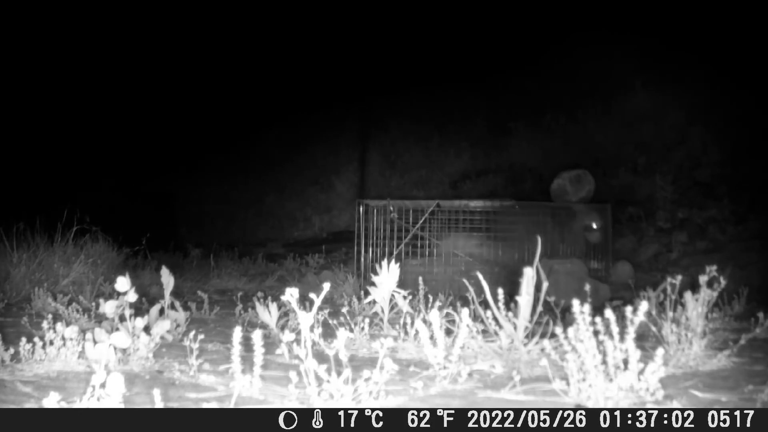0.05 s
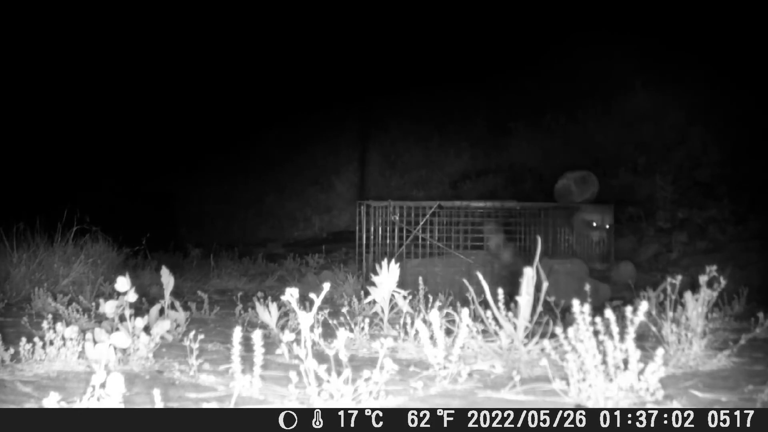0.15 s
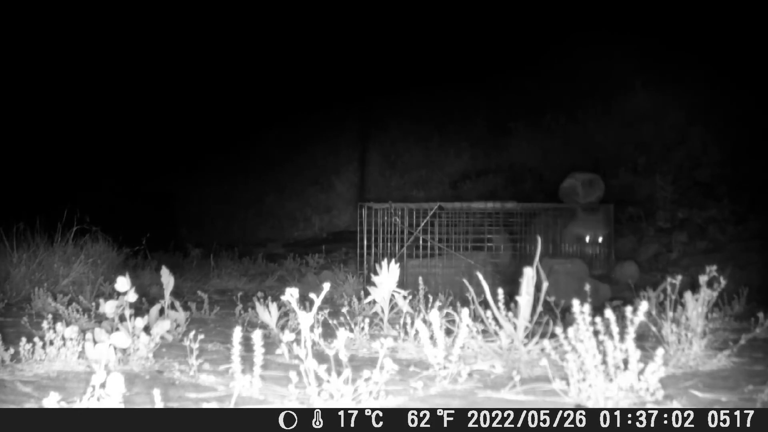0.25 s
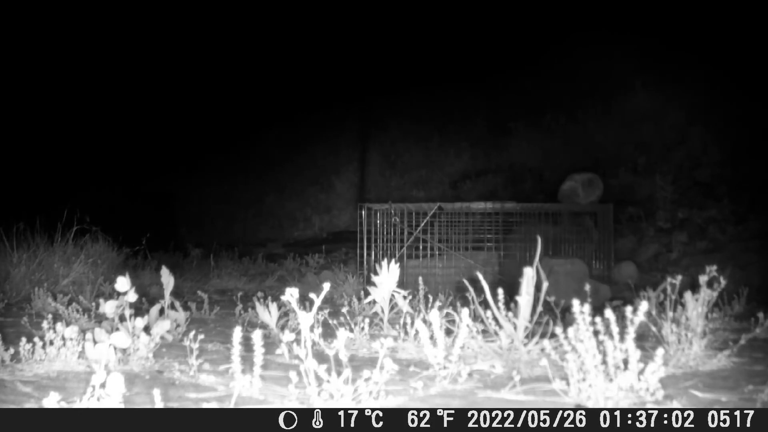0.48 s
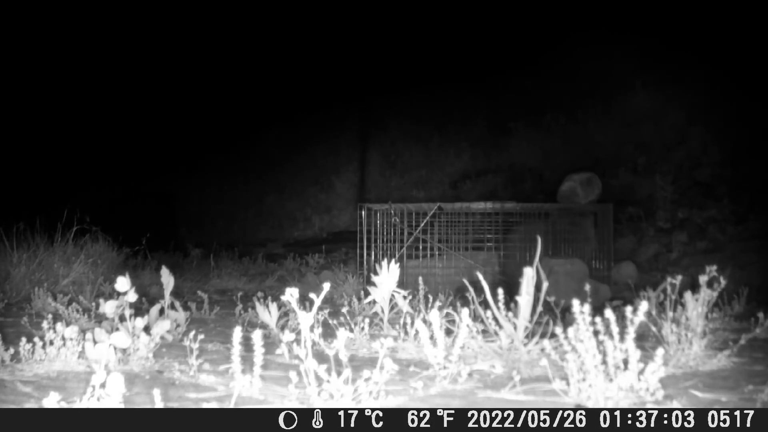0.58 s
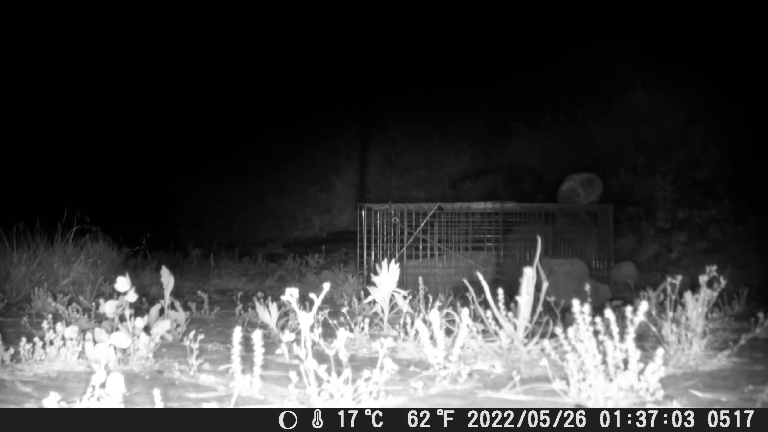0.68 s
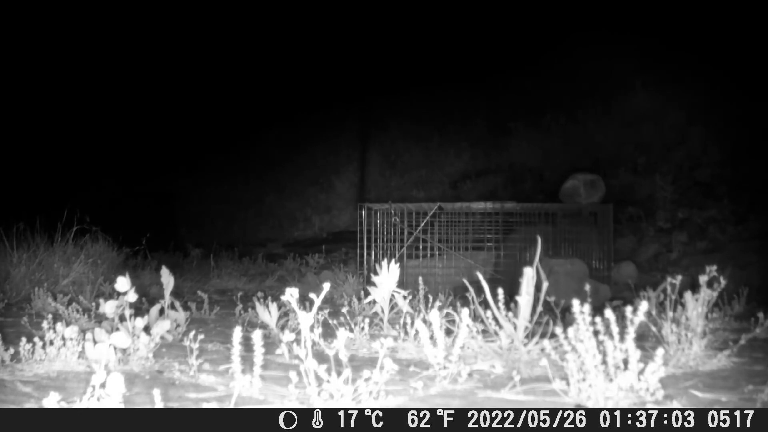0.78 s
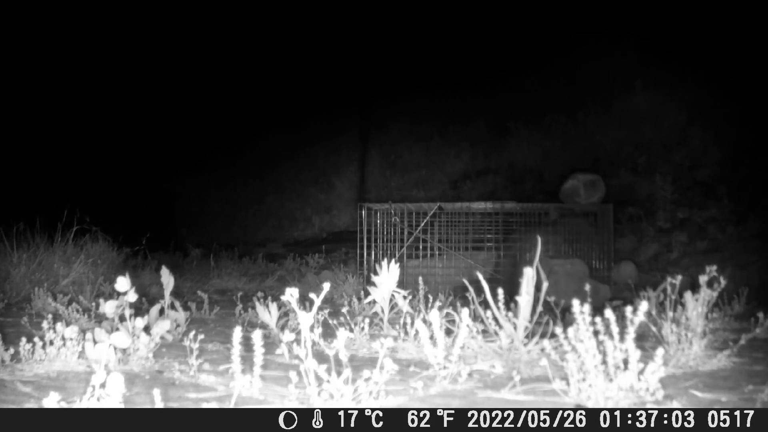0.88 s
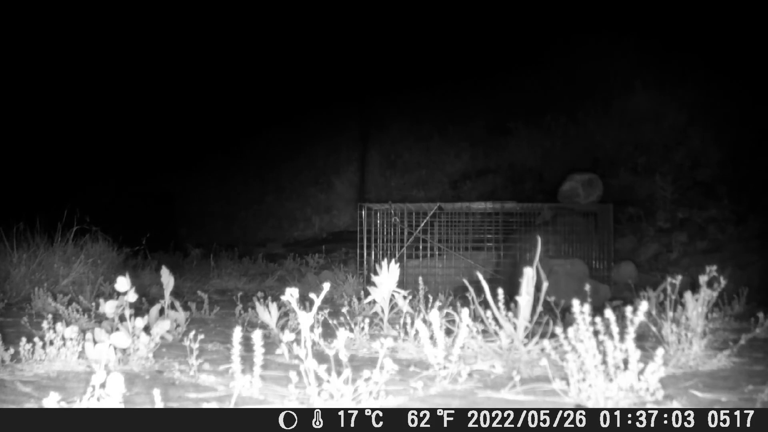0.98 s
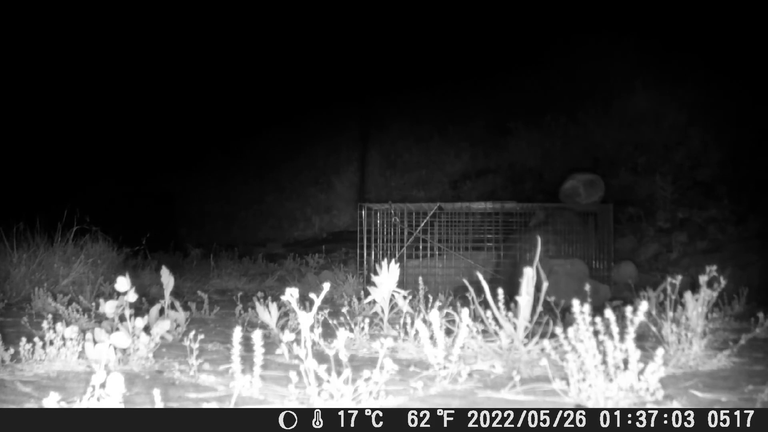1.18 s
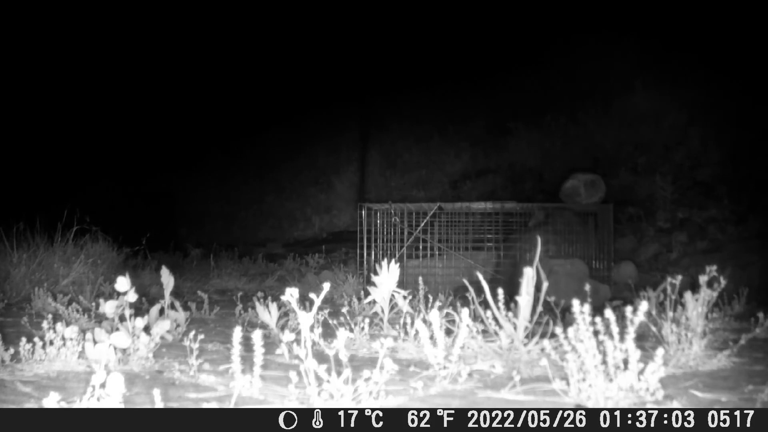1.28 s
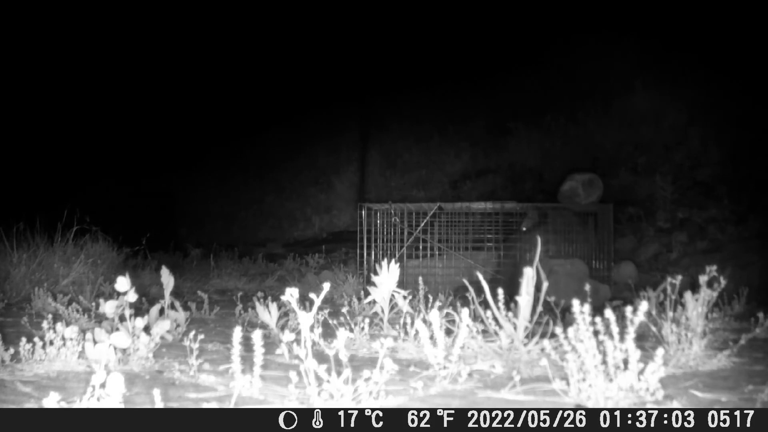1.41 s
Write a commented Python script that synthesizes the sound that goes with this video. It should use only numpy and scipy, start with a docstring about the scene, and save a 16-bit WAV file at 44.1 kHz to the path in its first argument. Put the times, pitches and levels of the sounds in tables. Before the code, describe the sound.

A metal cage trap snaps shut, its wire mesh jangling and fading in a quiet garden.

```python
"""A quiet garden at night, with a wire cage trap. An animal treads on the trip plate, the catch
lets go and the door slams: its plate booms, the wire mesh jangles, the frame thuds on the ground.
The cage then rocks and rattles ever more faintly over a low outdoor rumble. Plate, frame and
long wires ring as decaying modes; the dense mesh and the door's chatter are shaped noise."""
import sys
import numpy as np
from scipy import signal
from scipy.io import wavfile

SR = 44100
rng = np.random.default_rng(int(sys.argv[2]) if len(sys.argv) > 2 else 0)


def master(y):
    """Save y as 16-bit WAV."""
    cut = np.clip(np.atleast_2d(y).T, -1, 1)
    pcm = np.round(cut * 32767)  # scale
    wavfile.write(sys.argv[1], SR, pcm.astype(np.int16))


N = 63945
T = np.arange(N) / SR
HZ = np.fft.rfftfreq(N, 1 / SR)

# metal on metal: trip plate, catch, slam, rebounds, rattles
# (time [s], mesh jangle gain [dB], mesh sizzle gain [dB], door plate gain [dB])
KNOCKS = [(.084, -72.5, -74, -65.5), (.1214, -83, -76.5, -71), (.158, -85, -79.5, -66.5),
          (.231, -51, -52, -66), (.2347, -57.5, -56.5, -42.5), (.2408, -53, -53.5, -68.5),
          (.2438, -51, -56.5, -31), (.2566, -60, -54.5, -34), (.2658, -69, -60, -39.5),
          (.2696, -67, -64.5, -37.5), (.2857, -68.5, -68, -49), (.308, -60, -72.5, -71.5),
          (.3151, -67, -68.5, -52), (.3757, -69, -65, -52), (.4278, -63.5, -65.5, -56.5),
          (.4569, -66, -66.5, -58.5), (.518, -73, -81.5, -52), (.5584, -67.5, -73, -65),
          (.70, -74.5, -78.5, -72), (.7213, -73, -76.5, -64), (.78, -80.5, -78, -67),
          (.84, -78.5, -78.5, -76), (.90, -79.5, -83, -69.5), (.975, -80, -79.5, -74)]


def amp(db):
    """Decibels to gain."""
    return 10 ** (np.asarray(db) / 20)


def add(mix, start_s, sound):
    """Mix a sound in at start_s."""
    part = mix[round(start_s * SR):]
    part += sound[:len(part)]


def noise(gain):
    """Unit-rms noise shaped by a gain per frequency."""
    spectrum = rng.standard_normal(len(HZ)) + 1j * rng.standard_normal(len(HZ))
    shaped = np.fft.irfft(gain * spectrum, N)
    return shaped / shaped.std()


def colour(points):
    """Gain per frequency from (frequency [Hz], level [dB]) points."""
    hz, db = np.transpose(points)
    return amp(np.interp(np.log(HZ + 1), np.log(hz), db))


def band(hz, width_hz):
    """Gain per frequency of a resonance."""
    return 1 / (1 + ((HZ - hz) / width_hz * 2) ** 2)


def fade(t60_s):
    """Exponential decay, 60 dB down at t60_s."""
    return np.exp(-np.log(1000) * T / t60_s)


def rise(tau_s):
    """Soft attack."""
    return 1 - np.exp(-T / tau_s)


def ring(modes):
    """Decaying modes after one blow."""
    return sum(amp(db) * fade(t60_s) * np.sin(2 * np.pi * hz * T) for hz, db, t60_s in modes)


def garden():
    """Steady night background, and a deep rumble that swells while the cage shakes."""
    # night air spectrum (frequency [Hz], relative density [dB])
    night_spectrum = [(20, -1), (43, -4), (75, -5), (105, -4), (200, -8.5), (270, -14.5), (400, -14),
                      (530, -15.5), (700, -19.5), (1000, -23.5), (1500, -25.5), (2100, -30), (2700, -32),
                      (3500, -38.5), (4200, -48.5), (5000, -53), (5700, -47), (6500, -41), (7200, -41.5)]
    # rumble envelope (time [s], level [dB])
    rumble_levels = [(0, -74.5), (.22, -65), (.32, -62), (.46, -59), (.6, -60), (.9, -67), (1.45, -72.5)]
    night_db, night_top_hz = -65.5, 7300
    rumble_db = np.interp(T, *np.transpose(rumble_levels))
    rumble = amp(rumble_db) * noise(band(hz=38, width_hz=7.5))
    night = amp(night_db) * noise(colour(night_spectrum) * (HZ < night_top_hz))
    return night + rumble


def dull_bumps():
    """Soft low bumps of a cycle or two, no ring."""
    # low pulses (centre time [s], peak level [dB], frequency [Hz])
    bumps = [(0.243, -52.5, 74), (0.446, -51.5, 84.5), (.703, -55, 55), (0.769, -59, 50.3),
             (0.873, -54.5, 55), (1.085, -52.5, 47.4), (1.245, -53.5, 35)]
    half_width_s = 0.014
    out = np.zeros(N)
    for centre_s, db, hz in bumps:
        offset_s = T - centre_s
        out += amp(db) * np.exp(-(offset_s / half_width_s) ** 2) * np.cos(2 * np.pi * hz * offset_s)
    return out


def frame_thuds():
    """The frame rocks on the ground; each soft push rings the modes near its centre frequency."""
    # pushes from the ground (time [s], gain [dB], centre frequency [Hz])
    pushes = [(0.084, -58, 151.7), (0.1208, -58, 212), (0.1736, -54.5, 204), (0.2385, -31.5, 92.8),
              (.251, -42.5, 200), (0.3146, -43, 155), (.4036, -51.5, 143), (0.4554, -43, 231),
              (0.4908, -45, 173), (0.5536, -47.5, 161.3), (0.6114, -49, 181.7), (0.6791, -45.5, 194.4),
              (.731, -50, 214), (.805, -61, 146.6), (0.8773, -55, 228), (.9765, -56.5, 244)]
    # frame modes (frequency [Hz], relative level [dB], t60 [s])
    modes = [(100.4, -19, 0.45), (118.6, -3, 0.22), (142.15, 8, 0.29), (146, -15.5, 0.25),
             (201.6, 2.4, 0.29), (232, -12, 0.15)]
    spread_octaves = 0.46
    mode_hz = np.array(modes)[:, 0]
    tones = np.array([ring([mode]) for mode in modes]) * rise(tau_s=0.0092)
    out = np.zeros(N)
    for start_s, db, centre_hz in pushes:
        shares = np.exp(-(np.log2(mode_hz / centre_hz) / spread_octaves) ** 2)
        add(out, start_s, amp(db) * (shares @ tones))
    return out


def wire_mesh():
    """Each knock sets off a dense jangle and a thin-wire sizzle; a few long wires sing out."""
    # countless small mesh modes (frequency [Hz], relative density [dB])
    mesh_spectrum = [(60, -13), (250, 5), (400, 9.5), (600, 1), (760, -2), (1100, -2.5), (1800, -4.5),
                     (2300, -5.5), (2680, 3.5), (3000, -3.5), (3600, -7.5), (4300, -15.5), (4800, -31),
                     (5200, -34.5), (5550, -13), (5850, -14.5), (6100, -4), (6500, 3), (6750, -2.5),
                     (7250, -3.5), (7450, -36), (7700, -58), (8500, -58), (8740, -28), (9000, -35)]
    # long-wire modes (frequency [Hz], relative level [dB], t60 [s])
    wire_modes = [(1185, -17.5, 0.33), (1437, -13, .4), (2047, -13.5, 0.62), (2585, -6, 0.36),
                  (2717, -3.5, 0.25), (3134, -14, 0.6), (3488, -11.5, .4), (5590, -14, 0.25),
                  (6150, -11.5, 0.28), (6570, -10.5, 0.12), (6525, -7, 0.59)]
    sizzle_above_hz, max_detune_hz = 4900, 14
    wire_gain_db, tail_db = -4.5, -9
    envelope = rise(tau_s=0.0022) * (fade(t60_s=0.17) + amp(tail_db) * fade(t60_s=0.96))
    tones = np.array([amp(db) * fade(t60_s) * np.exp(2j * np.pi * hz * T)
                      for hz, db, t60_s in wire_modes])
    is_thin = np.array(wire_modes)[:, 0] > sizzle_above_hz
    wires, jangle_power, sizzle_power = np.zeros((3, N))
    for start_s, jangle_db, sizzle_db, _ in KNOCKS:
        add(jangle_power, start_s, (amp(jangle_db) * envelope) ** 2)
        add(sizzle_power, start_s, (amp(sizzle_db) * envelope) ** 2)
        detune_hz = max_detune_hz * rng.uniform(-1, 1)
        signs = np.sign(rng.uniform(-1, 1, len(wire_modes)))
        shares = signs * amp(np.where(is_thin, sizzle_db, jangle_db) + wire_gain_db)
        detuned = (shares @ tones) * np.exp(2j * np.pi * detune_hz * T)
        add(wires, start_s, detuned.imag)
    dense = noise(colour(mesh_spectrum))
    sizzle = np.fft.irfft(np.fft.rfft(dense) * (HZ > sizzle_above_hz), N)
    jangle = dense - sizzle
    return np.sqrt(jangle_power) * jangle + np.sqrt(sizzle_power) * sizzle + wires


def door():
    """Each knock rings the plate and leaves the loose door chattering in its guides."""
    # door plate modes (frequency [Hz], relative level [dB], t60 [s])
    plate_modes = [(369, -19, 0.34), (412, -24, 0.31), (452, -20.5, 0.14), (514.5, -5.5, .49),
                   (546, -6, 0.19), (566.4, 3, 0.25), (580.3, -7, 0.11), (600, -13.5, 0.092),
                   (630, -20.5, .19), (696, -24, .27), (870.6, -28, .18)]
    chatter_gain_db, dull_band_db = -18.5, -15
    boom = ring(plate_modes) * rise(tau_s=0.003)
    chatter_envelope = rise(tau_s=0.08) * fade(t60_s=1)
    booms, chatter_power = np.zeros((2, N))
    for start_s, _, _, plate_db in KNOCKS:
        add(booms, start_s, amp(plate_db) * boom)
        add(chatter_power, start_s, (amp(plate_db + chatter_gain_db) * chatter_envelope) ** 2)
    chatter = noise(band(hz=550, width_hz=110) + amp(dull_band_db) * band(hz=370, width_hz=73))
    return booms + np.sqrt(chatter_power) * chatter


def scene():
    """Trap and garden, mono."""
    return (door() + wire_mesh() + frame_thuds() + dull_bumps() + garden())[None]


def record(dry):
    """Steep low-pass on the top treble."""
    cutoff_hz = 9000
    taps = signal.firwin(601, cutoff_hz, window=("kaiser", 8), fs=SR)
    return signal.oaconvolve(dry, taps[None], "same")


dry = scene()
out = record(dry)
master(out)
```